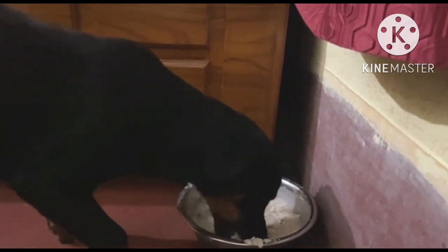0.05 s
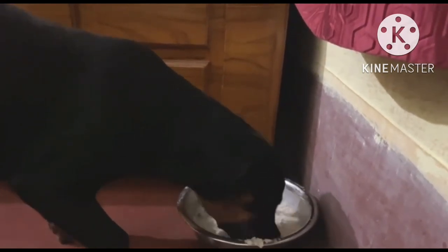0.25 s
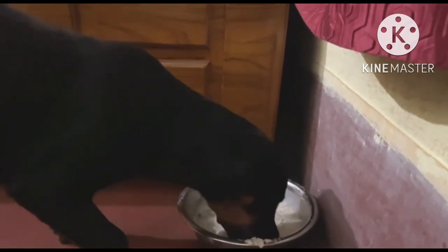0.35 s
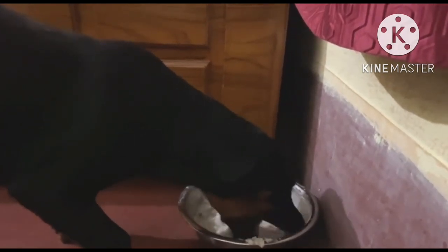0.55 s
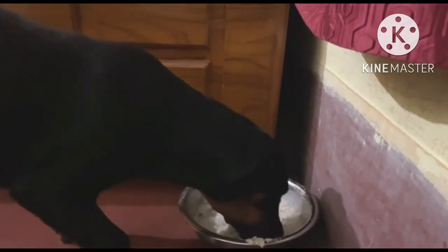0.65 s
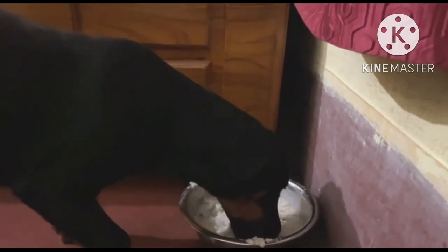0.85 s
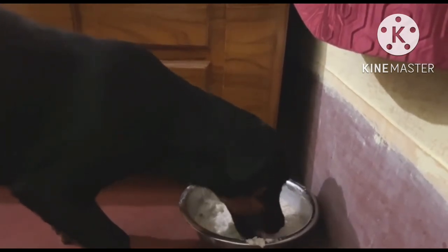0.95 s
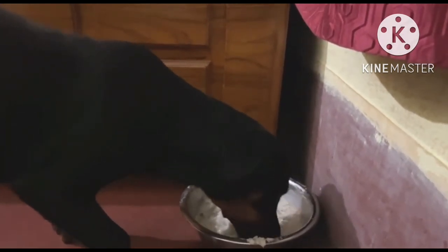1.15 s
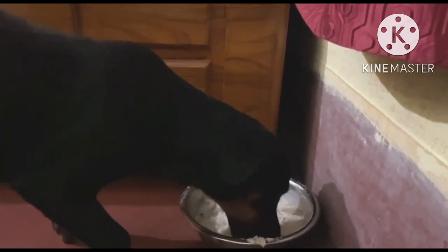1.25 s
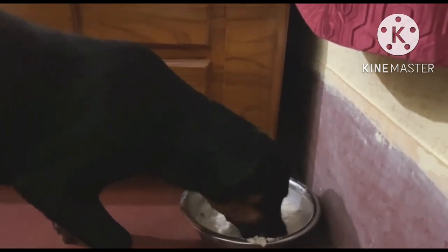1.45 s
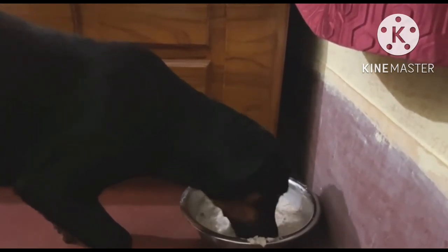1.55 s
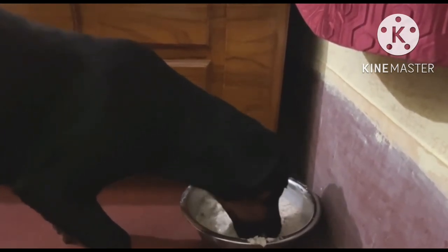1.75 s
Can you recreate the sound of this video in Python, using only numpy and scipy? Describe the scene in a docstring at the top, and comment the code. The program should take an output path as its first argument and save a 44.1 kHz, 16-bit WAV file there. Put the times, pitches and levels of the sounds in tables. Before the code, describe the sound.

Close wet chomping and lip smacking by a puppy at a steel bowl in a small room

```python
"""A puppy gulps wet food from a metal bowl on a hard floor in a small bare room, close to a two-microphone phone.
Low house rumble and hiss (coloured noise) run throughout; a faint saliva tick (a noise snap) comes first, more follow.
The first bite squelches (noise through a mouth cavity), smacks (a ring and a crack), thumps (sagging tones)
and rings the steel (blurred modes), loudest at a quarter second. Thumps crowd the stretch from 0.5 to 0.75 s,
then softer bites carry on to about 1.5 s and the last ticks fall near 1.65 s."""
import sys
import numpy as np
from scipy import signal
from scipy.fft import rfft, irfft, next_fast_len
from scipy.io import wavfile
from scipy.ndimage import map_coordinates

SR = 44100
rng = np.random.default_rng(int(sys.argv[2]) if len(sys.argv) > 2 else 0)


def output_pcm(signal):
    """Save a mono or channel-first signal as 16-bit PCM at the path in sys.argv[1].

    Samples are clipped to [-1, 1] before scaling.
    """
    pcm = np.clip(np.atleast_2d(signal).T, -1, 1) * 32767
    wavfile.write(sys.argv[1], SR, np.round(pcm).astype(np.int16))


N = 79380  # samples, 1.8 s

# House rumble and hiss over time. Each row: time in seconds, level in dB.
RUMBLE_LEVEL = [(0, -48), (.2, -49.5), (.45, -47.5), (.65, -42), (.88, -50), (1.05, -51), (1.25, -55),
                (1.5, -55), (1.8, -53)]
HISS_LEVEL = [(0, -63), (.1, -59), (.45, -58), (.8, -58.5), (.89, -73.5), (.95, -56), (1.2, -61),
              (1.27, -74.5), (1.33, -49.5), (1.62, -65.5), (1.8, -66.5)]
# Colour of the rumble and the hiss. Each row: frequency in Hz, relative density in dB.
RUMBLE_COLOUR = [(12, -41.5), (30, -23), (55, -1.5), (75, -1.5), (129, -7), (203, -13.5), (248, -16.5),
                 (359, -23.5), (397, -16.5), (600, -54.5), (780, -99), (1320, -120)]
HISS_COLOUR = [(290, -37), (500, 10), (1300, 7.5), (2280, 7), (2970, 3), (3440, 4), (7950, -17),
               (10100, -9.5), (12000, -70), (15600, -66), (22000, -120)]
# Stereo width of room and background. Each row: frequency in Hz, left-right likeness (1 is identical).
ALIKE = [(130, .99), (270, .88), (570, -.15), (1200, -.15), (2500, .1), (5000, 0)]

# Saliva ticks. Each row: start in seconds, level in dB, centre in Hz.
TICKS = [(0.063, -59, 5470), (0.235, -31, 6400), (0.4792, -42.5, 9000), (0.4803, -38.5, 3660),
         (.533, -42.5, 3200), (0.789, -53.5, 7270), (0.836, -64.5, 10100), (.909, -61, 8300),
         (0.929, -61, 5060), (1.064, -38, 4030), (1.204, -52.5, 3927), (1.311, -53, 4020),
         (1.356, -52, 9400), (1.636, -53, 8150), (1.665, -54.5, 3460)]
TICK_Q, TICK_RISE_S, TICK_T60_S = 2, .002, .014

# Reverb decay. Each row: frequency in Hz, time to fall 60 dB in seconds.
ROOM_DECAY = [(150, 0.41), (400, 0.44), (1040, 0.28), (2760, 0.38), (7280, 0.27)]
# Reverb colour. Each row: frequency in Hz, level against the direct sound in dB.
ROOM_COLOUR = [(150, -8), (500, -6), (800, -4.5), (1200, 0.5), (1800, -6.5), (2550, -4), (3400, -12),
               (6000, -2), (10000, -14), (11500, -25)]
ROOM_GAP_S = 0.0045  # the tail is half faded in by then

# Tongue through the mush. Each row: start in seconds, level in dB, mouth cavity start in Hz,
# cavity end in Hz, rise in seconds, 60 dB fade in seconds, treble against the cavity in dB.
SQUELCHES = [(.112, -44, 1730, 1300, 0.015, 0.32, 0.5), (0.232, -33, 1530, 1538, 0.0073, 0.04, -17),
             (0.48, -47.5, 1270, 1260, 0.0086, 0.38, 2.5), (.586, -31, 1660, 1790, 0.0083, 0.15, -5.5),
             (.922, -57, 1300, 1600, 0.012, 0.2, -3), (0.948, -43.5, 1600, 1100, 0.0066, 0.27, -6.5),
             (1.06, -48.5, 1275, 1366, 0.019, 0.14, 3.5), (1.299, -56.5, 1634, 1280, 0.012, 0.26, -8.5),
             (1.316, -45, 1500, 1160, 0.018, 0.1, 0), (1.429, -50, 1650, 1270, 0.003, 0.29, 0.5),
             (1.786, -55.5, 2960, 2900, 0.005, 0.092, -16)]
# Colour of the wet treble. Each row: frequency in Hz, relative density in dB.
MUSH_COLOUR = [(290, 2.5), (500, 6.5), (688, 2), (1430, -13), (1550, -2.5), (1890, -32), (2400, -15),
               (6510, -8.5), (10500, -22), (12000, -38), (15600, -70), (22000, -120)]
CAVITY_Q, CAVITY_SLIDE_S = 2.87, 0.048  # sharpness; time the cavity takes to change shape
CLUMPS_PER_S, CLUMP_DB = 150, 4  # how fast and how deeply the mush tears
BUBBLES_PER_S, BUBBLE_DB = 400, -1.5  # level against the mush noise
BUBBLE_SPREAD_DB = 24  # from the smallest to the largest bubble
BUBBLE_HZ, BUBBLE_RANGE, BUBBLE_CYCLES = 2130, 3.8, 1  # middle; ratio up or down; cycles of decay

# Lip smacks. Each row: start in seconds, level in dB, cavity in Hz, rise in seconds,
# 60 dB ring in seconds, crack against the ring in dB.
SMACKS = [(0.122, -40, 1626, 0.0033, 0.086, -12), (0.1482, -24.5, 2657, 0.0012, 0.023, -8),
          (.2441, -4, 3300, .0008, .005, -18), (.2457, -4.5, 2350, .0007, .004, -14),
          (.236, -27, 1637, 0.0092, 0.086, -40), (0.2478, -19, 2830, 0.00065, 0.01, -30),
          (.261, -13.5, 2170, 0.00086, 0.0058, -36), (0.2622, -21, 3170, 0.001, 0.0032, -28),
          (0.5973, -23, 1560, 0.0025, 0.0066, -5), (0.601, -25.5, 3300, 0.00071, 0.015, -18),
          (0.615, -29, 1995, 0.0024, 0.0082, -36), (0.955, -41.5, 1680, 0.0074, 0.03, -17),
          (.956, -46, 2290, 0.0055, .04, -28), (0.979, -41, 1452, 0.003, 0.043, -15),
          (1.073, -41.5, 1430, 0.0033, 0.005, -0.5), (1.301, -50.5, 1660, 0.0047, 0.033, -26),
          (1.312, -40, 1337, 0.0018, 0.022, -26), (1.433, -43, 3370, 0.0095, 0.036, -7),
          (1.325, -37, 1620, 0.0013, 0.022, -14.5), (1.338, -36.5, 3020, 0.0017, 0.0093, -30),
          (1.351, -39.5, 2900, 0.0022, 0.011, -31), (1.336, -32.5, 1036, 0.00068, 0.031, -19),
          (1.46, -47, 1610, 0.0022, 0.01, 0.5), (1.504, -46.5, 1610, 0.0034, 0.0088, -7),
          (1.351, -32.5, 1120, 0.0012, 0.013, -21)]
# Colour of the crack. Each row: frequency in Hz, relative density in dB.
CRACK_COLOUR = [(530, -65), (900, -54.5), (1470, -13.5), (3340, -3.5), (4190, 0), (4600, -32.5),
                (5000, -16), (6500, -18), (9870, -7), (11400, -27.5), (12000, -55.5), (15600, -81.5),
                (22000, -120)]
CRACK_T60_S = 0.0066

# Jaw closing, bowl pressed on the floor. Each row: start in seconds, level in dB, start pitch in Hz,
# end pitch in Hz, rise in seconds, 60 dB ring in seconds.
THUMPS = [(0.127, -38.5, 273, 272.3, 0.003, 0.081), (0.237, -20, 268, 230.6, 0.0069, 0.021),
          (.243, -25.5, 448, 429, 0.0027, 0.015), (0.491, -23, 548, 414, 0.0027, 0.025),
          (.499, -35.5, 914, 823, 0.0011, 0.023), (.515, -38.5, 272, 275.8, 0.0013, 0.43),
          (0.547, -36.5, 68.7, 58, 0.005, 0.098), (.506, -30, 717, 698, 0.0029, 0.026),
          (.596, -22, 457, 410, 0.0038, 0.014), (0.63, -24, 232, 156.4, 0.0047, 0.033),
          (0.643, -30.5, 265.4, 270, 0.0025, 0.14), (0.668, -28, 280, 242.4, 0.0047, 0.052),
          (.678, -32, 451, 481, 0.0024, 0.075), (.686, -25, 260, 240.4, 0.0045, 0.02),
          (0.702, -32.5, 318.7, 276, 0.0044, 0.032), (.716, -47, 330, 303, 0.0052, .03),
          (0.733, -38.5, 485, 467, 0.0015, 0.025), (0.933, -39.5, 245.5, 203, 0.0027, 0.025),
          (.955, -42.5, 527, 478, 0.0042, .03), (0.943, -37, 118, 104, 0.0024, 0.038),
          (1.0666, -26, 282.7, 256.7, 0.0099, 0.035), (1.066, -37.5, 480, 432, 0.0032, 0.024),
          (1.094, -42, 435, 410, 0.006, 0.043), (1.09, -36.5, 282, 275, 0.0035, 0.044),
          (1.326, -33.5, 512, 410, 0.0025, 0.0075), (1.433, -26.5, 520, 212.5, 0.0067, 0.015),
          (1.434, -35, 526, 403, 0.0038, 0.05), (1.455, -40, 417, 402, 0.0023, 0.051),
          (1.45, -38, 227, 206, 0.0064, 0.11), (1.487, -32, 213, 140.5, 0.0015, 0.068),
          (1.518, -43.5, 312, 282, 0.0066, 0.022), (1.531, -31, 124, 102.7, 0.0018, .04)]
GLIDE_S = 0.0027  # time constant of the pitch glide
UPPER_RATIO, UPPER_DB, UPPER_T60_S = 1.923, -12, 0.018  # the overtone of each thump

# Teeth tap the bowl. Each row: start in seconds, level in dB.
TAPS = [(0.1472, -47.5), (0.2447, -30.5), (.262, -32)]
# Ringing modes of the steel. Each row: frequency in Hz, level in dB, 60 dB ring in seconds.
BOWL_MODES = [(1723, -19.5, 0.16), (1911, -7.5, 0.28), (2203, -21, 0.18), (2174, -11, 0.11),
              (2570, -4, 0.13), (2482, 0.5, 0.24), (2573, -10, 0.35), (2774, -8.5, 0.28),
              (2998, -8.5, 0.31), (3870, -12, 0.15), (4156, -25, 0.37)]
BOWL_BLUR_HZ = 35  # the food smears each mode over this width

# Near sound at the two ports. Each row: frequency in Hz, left over right in dB.
LEFT_LOUDER = [(400, -.5), (700, -1), (1200, 2), (2200, 0), (3300, 4), (5500, 0), (9000, 2)]
# Near sound at the two ports. Each row: frequency in Hz, phase lead of the left in radians.
LEFT_LEADS = [(200, -.1), (700, -.5), (1800, -.6), (2500, 1.7), (3300, 1.8), (5000, 1.2), (7000, 2.7),
              (9000, 2.2), (10500, .8)]
MIC_LOW_HZ = 41.7  # bass corner
TOP_HZ, TOP_SLOPE_HZ = 12200, 900  # band limit; width of the slope below it


def amp(db):
    """Decibels as a gain."""
    return 10 ** (np.asarray(db) / 20)


def unit(x):
    """Scale to rms 1."""
    return x / np.sqrt(np.mean(x ** 2) + 1e-20)


def along(points, hz):
    """Read a table of frequencies and values, joined on a log frequency axis."""
    f, value = np.transpose(points)
    return np.interp(np.log(hz + 1), np.log(f + 1), value)


def curve(rows):
    """Turn a table of times and decibels into a gain per sample."""
    return amp(np.interp(np.arange(N) / SR, *np.transpose(rows)))


def filtered(x, response):
    """Filter x by a complex response of frequency."""
    n = x.shape[-1]
    padded = next_fast_len(n + 8192)
    spectrum = rfft(x, padded) * response(np.fft.rfftfreq(padded, 1 / SR))
    return irfft(spectrum, padded)[..., :n]


def noise(colour, size):
    """Coloured noise of rms 1."""
    return unit(filtered(rng.standard_normal(size), lambda hz: amp(along(colour, hz))))


def band(x, hz, q):
    """One resonance, scaled to rms 1."""
    def resonance(f):
        damping = 1j * f * hz / q
        return damping / (hz * hz - f * f + damping)
    return unit(filtered(x, resonance))


def burst(t, rise, t60):
    """Envelope: a smooth rise, then an exponential decay."""
    attack = np.sin(np.pi / 2 * np.clip(t / rise, 0, 1)) ** 2
    return attack * amp(-60 * np.maximum(t - rise, 0) / abs(t60))


def add(track, s, sound):
    """Mix a sound into the track at s seconds."""
    track[round(s * SR):][:len(sound)] += sound


def blank(seconds):
    """An empty track with a second to spare, and the clock of one event."""
    return np.zeros(N + SR), np.arange(int(seconds * SR)) / SR


def spread(pair):
    """Turn two unrelated signals into left and right: alike in the bass, mostly unrelated above."""
    def mid_side(hz):
        angle = np.arccos(np.clip(along(ALIKE, hz), -1, 1)) / 2
        return np.array([np.cos(angle), np.sin(angle)])
    mid, side = filtered(pair, mid_side)
    return np.array([mid + side, mid - side])


def background():
    """Lumpy low house rumble, nearly centred, and a wide hiss that dips now and then, both coloured noise."""
    rumble = curve(RUMBLE_LEVEL) * noise(RUMBLE_COLOUR, (2, N))
    hiss = curve(HISS_LEVEL) * noise(HISS_COLOUR, (2, N))
    return spread(rumble + hiss)


def ticks():
    """Saliva threads snap: short noise through the same resonance twice."""
    out, t = blank(1 / 50)
    for s, db, hz in TICKS:
        snap = band(rng.standard_normal(len(t)), hz, TICK_Q)
        snap = band(snap, hz, TICK_Q)
        add(out, s, amp(db) * burst(t, TICK_RISE_S, TICK_T60_S) * snap)
    return out[:N]


def room(x):
    """The walls answer with decaying noise; a fresh random tail is drawn for each eighth of a second."""
    out, step = np.zeros((2, N + SR)), SR // 8
    for at in range(0, N, step):
        hz, t, grid = signal.stft(rng.standard_normal((2, SR // 2)), SR, nperseg=256)
        decay = amp(-60 * t / along(ROOM_DECAY, hz)[:, None])
        tail = signal.istft(grid * decay, SR, nperseg=256)[1]
        # silence, then a short fade in, before the walls are heard
        tail = tail * np.clip(np.arange(tail.shape[1]) / SR / ROOM_GAP_S - .5, 0, 1)
        tail = tail / np.linalg.norm(tail[0])
        wet = signal.fftconvolve(x[None, at:at + step], tail, axes=1)
        out[:, at:at + wet.shape[1]] += wet
    return spread(filtered(out[:, :N], lambda hz: amp(along(ROOM_COLOUR, hz))))


def bubbles(n):
    """Bubbles burst in the mush: short damped blips of scattered pitch and size."""
    draw = rng.random((int(BUBBLES_PER_S * n / SR), 4))
    t = np.arange(128) / SR
    at = (draw[:, :1] * n).astype(int)
    size = amp(BUBBLE_SPREAD_DB * draw[:, 1:2])
    # two draws summed favour the middle pitch
    hz = BUBBLE_HZ * BUBBLE_RANGE ** (draw[:, 2:3] + draw[:, 3:] - 1)
    envelope = (t * hz) * np.exp(-3 * t * hz / BUBBLE_CYCLES)
    blips = size * np.sin(2 * np.pi * hz * t) * envelope
    places = (at + np.arange(len(t))).ravel()
    return unit(np.bincount(places, blips.ravel(), minlength=n)[:n])


def squelches():
    """Wet friction, torn into clumps, through a sliding mouth cavity, with mush noise and bubbles on top."""
    out, t = blank(1 / 4)
    slid = np.pi / 2 * np.clip(t / CAVITY_SLIDE_S, 0, 1)
    for s, db, start_hz, end_hz, rise, t60, treble_db in SQUELCHES:
        knots = rng.standard_normal(CLUMPS_PER_S)
        clumps = amp(CLUMP_DB * map_coordinates(knots, [t * CLUMPS_PER_S]))
        friction = clumps * rng.standard_normal(len(t))
        # the slide is a crossfade between two cavity shapes
        mouth = np.cos(slid) * band(friction, start_hz, CAVITY_Q)
        mouth += np.sin(slid) * band(friction, end_hz, CAVITY_Q)
        fizz = noise(MUSH_COLOUR, len(t)) + amp(BUBBLE_DB) * bubbles(len(t))
        add(out, s, amp(db) * burst(t, rise, t60) * (mouth + amp(treble_db) * fizz))
    return out[:N]


def smacks():
    """The lips part with a pop: a noise crack and a short sine ring of the cavity."""
    out, t = blank(1 / 20)
    for s, db, hz, rise, t60, crack_db in SMACKS:
        ring = burst(t, rise, t60) * np.sin(2 * np.pi * hz * t)
        crack = amp(crack_db) * burst(t, rise, CRACK_T60_S) * noise(CRACK_COLOUR, len(t))
        add(out, s, amp(db) * (ring + crack))
    return out[:N]


def thumps():
    """Jaw and bowl knock softly: low tones whose pitch mostly sags, each with one overtone."""
    out, t = blank(1 / 5)
    for s, db, start_hz, end_hz, rise, t60 in THUMPS:
        pitch = end_hz + (start_hz - end_hz) * np.exp(-t / GLIDE_S)
        phase = 2 * np.pi * np.cumsum(pitch) / SR
        body = burst(t, rise, t60) * np.cos(phase)
        upper = amp(UPPER_DB) * burst(t, rise, UPPER_T60_S) * np.cos(UPPER_RATIO * phase)
        add(out, s, amp(db) * (body + upper))
    return out[:N]


def taps():
    """Teeth ring the steel bowl: decaying modes whose phase wanders, blurred by the food."""
    out, t = blank(1 / 3)
    for s, db in TAPS:
        for hz, mode_db, t60 in BOWL_MODES:
            drift = np.cumsum(rng.standard_normal(len(t))) * np.sqrt(2 * np.pi * BOWL_BLUR_HZ / SR)
            ring = np.sin(2 * np.pi * (hz * t + rng.random()) + drift)
            level = amp(db + mode_db + rng.normal(0, 1.0))  # each tap strikes the modes unevenly
            add(out, s, level * burst(t, .002, t60) * ring)
    return out[:N]


def at_ports(near):
    """The phone's body shades and delays the near sound differently at its two ports."""
    side = np.array([[.5], [-.5]])  # half the difference to each side

    def ports(hz):
        return amp(side * along(LEFT_LOUDER, hz)) * np.exp(1j * side * along(LEFT_LEADS, hz))
    return filtered(np.array([near, near]), ports)


def scene():
    """The puppy up close, the room's answer to it, and the house behind."""
    near = ticks() + squelches() + smacks() + thumps() + taps()
    return at_ports(near) + room(near) + background()


def record(dry):
    """The microphones lose the deep bass; nothing is kept above the band limit."""
    def response(hz):
        low_cut = (1j * hz / (MIC_LOW_HZ + 1j * hz)) ** 2
        top_cut = np.clip((TOP_HZ - hz) / TOP_SLOPE_HZ, 0, 1) ** 2
        return low_cut * top_cut
    return filtered(dry, response)


dry = scene()
out = record(dry)
output_pcm(out)
```